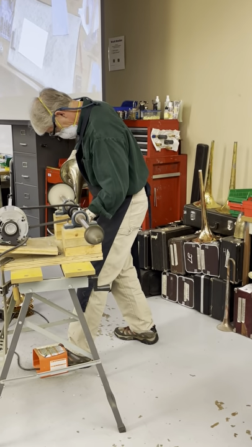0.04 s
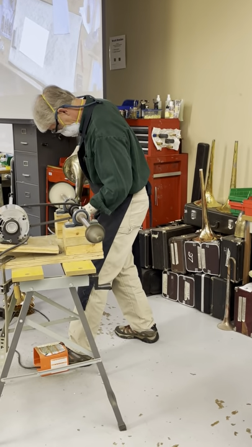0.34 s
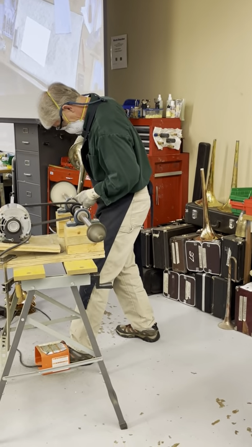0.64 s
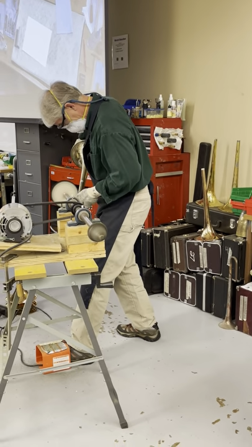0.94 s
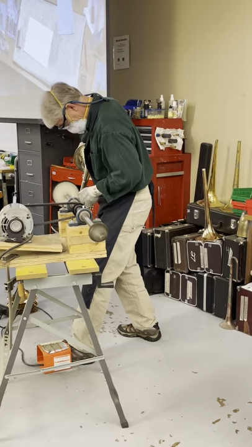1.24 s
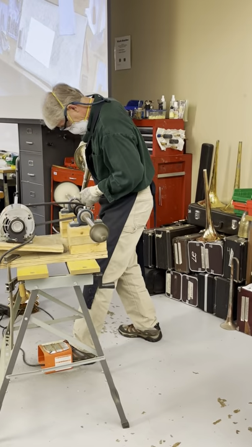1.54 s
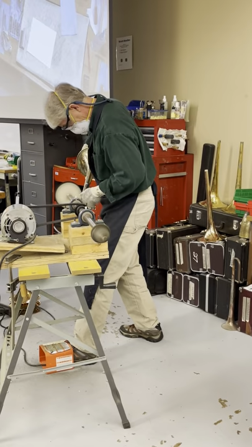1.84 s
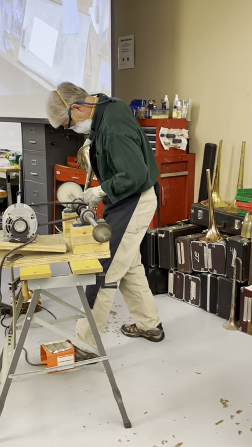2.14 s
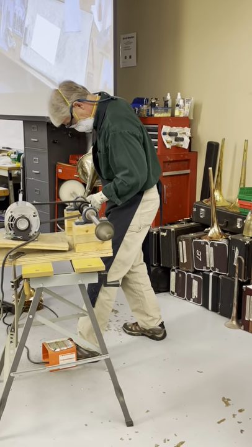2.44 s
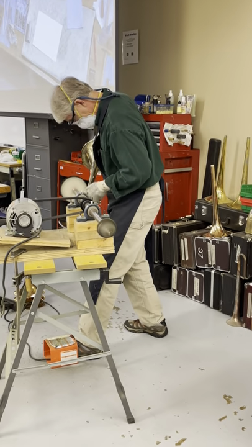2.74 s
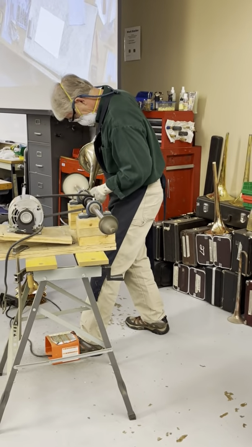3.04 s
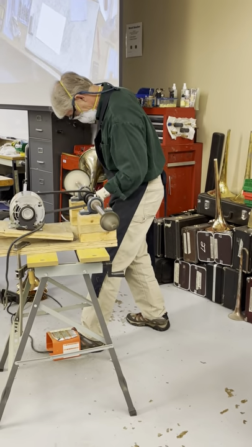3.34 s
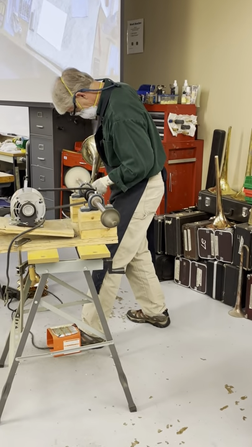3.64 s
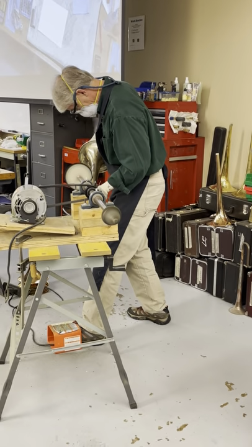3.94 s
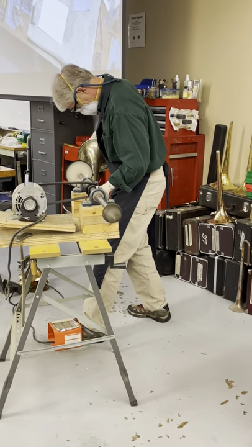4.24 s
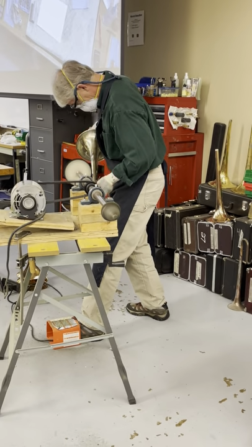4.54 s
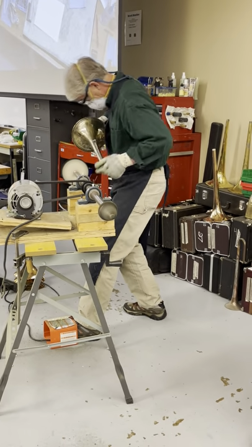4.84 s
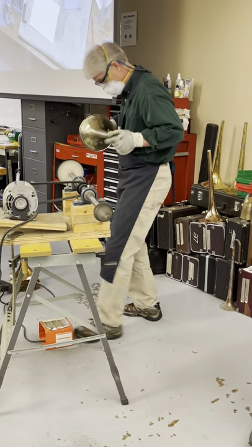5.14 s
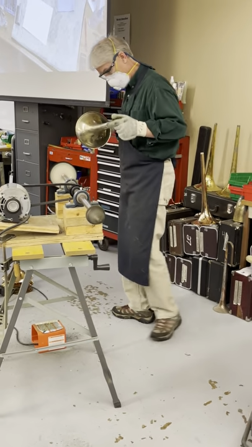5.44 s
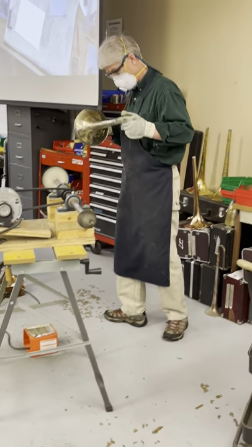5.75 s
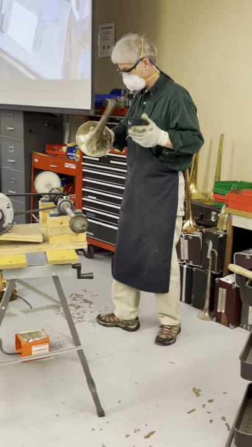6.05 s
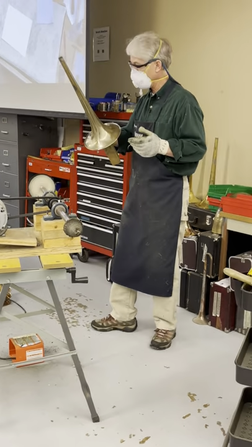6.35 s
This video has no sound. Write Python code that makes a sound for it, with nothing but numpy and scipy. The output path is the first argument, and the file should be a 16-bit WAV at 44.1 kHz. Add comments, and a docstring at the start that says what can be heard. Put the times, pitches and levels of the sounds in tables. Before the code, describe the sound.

From the start, a brass instrument bell rubs against a spinning cloth buffing wheel, heard close in stereo in a workshop. A gritty, rapidly fluttering hiss sits over the electric motor's whirr and hum. The metal rings and buzzes in uneven strokes, several a second, with high tones swelling and fading. At about 4.5 seconds the bell lifts off: the hiss dies quickly and the motor speeds up slightly, its whine clearer. Just after 5 seconds a metal foot pedal clicks and cuts the power. The whirr falls in pitch and fades, and the shaft gives a faint squeak from about 5.5 seconds, ending in a falling chirp as it stops near 6 seconds. Meanwhile gloves softly scuff and tick on the brass. A low ventilation rumble runs underneath throughout and remains alone until the end, around 6.5 seconds.

```python
"""A brass bell held against a cloth buffing wheel, close to a stereo microphone pair in a workshop.
The tufts brush the metal on every turn and make it hiss, ring and sing, stroke by stroke.
The bell is lifted off and the motor speeds up; a pedal switch cuts the power, and the spindle
coasts down and stops with a faint squeak. All round the room the ventilation rumbles on."""
import sys
import numpy as np
from scipy import signal
from scipy.fft import rfft, irfft
from scipy.io import wavfile
from scipy.ndimage import uniform_filter1d

SR = 44100
rng = np.random.default_rng(int(sys.argv[2]) if len(sys.argv) > 2 else 0)


def wav_record(signal):
    """Record a signal, one row per channel, as 16-bit PCM in the file named by sys.argv[1]."""
    frames = np.transpose(np.atleast_2d(signal))
    bounded = np.clip(frames, -1, 1)
    # unit amplitude maps onto the largest positive 16-bit level
    quanta = np.round(bounded * 32767).astype(np.int16)
    wavfile.write(sys.argv[1], SR, quanta)


N = 290598
TIME = np.arange(N) / SR
BIN_HZ = np.arange(N // 2 + 1) * SR / N

# Noise spectra. Each row: frequency in Hz, relative level in dB.
VENT_SPECTRUM = [(20, -15), (38, -19), (52, 2.5), (65, 7.5), (82, -1), (150, -14), (205, -3.5), (300, -9),
                 (400, -9.5), (600, -19), (1000, -33), (1600, -35.5), (3000, -33.5), (6000, -39.5),
                 (12000, -56), (16000, -62)]
WHIRR_SPECTRUM = [(100, -9), (280, 10), (540, 11.5), (750, -3), (1000, -11), (1500, 2.5), (2200, 3.5),
                  (3200, 0.5), (5500, -8.5), (8000, -13.5), (12000, -20.5), (16000, -17)]
HISS_SPECTRUM = [(400, -39), (800, -15.5), (1100, -1.5), (1500, -4.5), (2200, 2), (3000, -1), (3600, -4),
                 (4400, -4), (6300, -0.5), (8000, -14), (10000, -16), (16000, -13.5)]
RUSTLE_SPECTRUM = [(150, -13), (400, -4.5), (650, -12.5), (1000, -11.5), (2500, -50)]
GRIT_SPECTRUM = [(3000, -17), (7000, -25), (9000, 9.5), (11000, -2), (12800, -7), (14500, -5), (16000, 4)]
# Resonances. Each row: frequency in Hz, width in Hz, relative level in dB.
DUCT_MODES = [(126.6, 31, 0)]
CASING_MODES = [(748, 120, -6)]   # air cavity of the motor
HOUSING_MODES = [(766, 49, 3), (1360, 200, -2), (1750, 490, -2.5), (2110, 400, -4)]   # spindle housing
PEDAL_MODES = [(1030, 110, -3), (1450, 120, 1), (2180, 250, -1), (2580, 110, 5.5), (2930, 200, -0.5),
               (3830, 610, -11), (4800, 400, -5), (6430, 780, -9)]   # the pedal's metal shell
KNOCKED_BELL_MODES = [(1130, 124, 2), (2240, 280, -1), (3080, 500, -3.5), (3800, 400, -3.5),
                      (4760, 470, -2.5), (6000, 1100, -5.5), (9250, 2700, -13), (14800, 2000, -18)]
# Whine of fan and bearings. Each entry: a multiple of the spindle speed.
WHINE_ORDERS = [7.4, 12, 13, 14, 15, 22, 23, 25, 31]
# The same tones. Each row: level in dB running free, level in dB under the bell.
WHINE_DB = [(-50, -55.5), (-55, -66), (-67.5, -60), (-50, -54), (-50, -51.5), (-63, -57), (-63, -57.5),
            (-57, -65), (-61, -52.5)]
# Rub of the stopping shaft. Each row: time in seconds, pitch in Hz, level in dB,
# relative level of the octave in dB, roughness as a share of the pitch.
SHAFT_RUB = [(5.45, 3130, -85, -20, 0.15), (5.55, 3080, -57, -15, 0.08), (5.8, 3065, -61, -18, 0.11),
             (5.87, 3020, -56, -5, .055), (5.9, 2790, -58.5, -2, 0.1), (5.92, 2380, -62, 13, .05),
             (5.95, 2225, -58, 5, 0.14), (6.0, 2150, -90, 0, .05)]
# Small impacts. Each row: start in seconds, relative level in dB, treble boost in dB.
PEDAL_CONTACTS = [(5.0682, -18, -19), (5.073, -32, -14), (5.129, -36, -6), (5.149, -34, -8)]
BELL_TOUCHES = [(0.184, -19, -14), (0.198, -28, -10), (0.372, -23, -12), (5.42, -39, -1), (5.4414, -32, 6),
                (5.446, -41, 2), (5.551, -43, 4), (5.652, -42.5, -7), (5.749, -44, -2), (5.927, -46, 6),
                (6.059, -47, 2)]
# Gloves on the lifted bell. Each row: time in seconds, level in dB.
GLOVE_LEVELS = [(4.7, -78), (5.0, -54), (5.5, -62), (5.9, -62), (6.2, -78)]
# Strokes across the wheel. Each row: middle in seconds, length in seconds, rise of the ring in dB,
# push as spindle speed lost in turns per second (negative when the hands ease off).
BELL_STROKES = [(0.01, 0.16, 9, 0), (0.18, .2, 4.5, 0.6), (0.304, .17, -3, -.3), (0.41, .2, 7.5, .5),
                (0.588, .3, 5, .35), (0.878, .26, 2, .25), (1.209, .32, 7, -.1), (1.516, .26, 6.5, -.25),
                (1.747, .24, 8, .2), (1.878, .24, 9, .05), (2.107, .24, 9.5, .05), (2.302, .26, 8, .25),
                (2.523, .24, 3.5, -.55), (2.753, .24, 6.5, .15), (2.963, .16, 1, -.35),
                (3.101, .28, 7.5, .65), (3.322, .36, 6, -.1), (3.565, .26, 6.5, .6), (3.741, .2, 2.5, -.15),
                (3.95, .28, 6, .7), (4.221, .36, 5.5, .5), (4.462, .24, 3.5, -.4)]
# Slow course of the rubbing. Each row: time in seconds, hiss and grit levels in relative dB.
RUBBING_LEVELS = [(0.0, -33.5, -43), (0.17, -35, -45), (0.29, -35.5, -46.5), (0.98, -37.5, -46),
                  (1.16, -36.5, -48), (1.92, -36.5, -46), (2.04, -38, -43), (2.82, -36, -47.5),
                  (2.89, -38, -45), (3.37, -34.5, -42.5), (3.61, -34, -43.5), (3.75, -36.5, -46),
                  (3.95, -34.5, -43), (4.5, -35.5, -45.5)]
# The bell's wall, damped by the hands. Each row: frequency in Hz, width in Hz,
# relative levels in dB when rubbed at spots 0, 1 and 2.
WALL_MODES = [(1565, 34, -13, -11.5, -9), (1600, 28, -11, -6, -8), (1830, 49, -21, -10, -11),
              (1892, 49, 0, -6, -2.5), (2020, 48, -18, -13, -10), (2150, 57, -10, -14, -13),
              (2197, 28, 0, -13, -3), (2330, 48, -31, -8, -14), (2634, 51, -15, -9, -18),
              (2850, 40, -5.5, -6.5, -11), (3320, 45, -9, -7.5, -6.5), (3810, 59, -6, -7, -14),
              (3960, 160, -2, -15, -8), (4080, 66, -12, -13, -10), (4325, 103, 1, -5, -2),
              (4500, 66, -15, -11, -7), (4730, 84, -6, -4.5, -7), (5180, 100, -14, -7, -10),
              (5570, 43, -17, -28, -24), (9300, 96, -28, -18, -20)]
# Where the wheel touches. Each row: time in seconds, spot (beyond 0-2 the nearest end counts).
CONTACT_SPOT = [(0, -1.5), (.42, 0), (.52, 9), (.9, 1.1), (2.35, 1.2), (2.46, 2), (3.95, 3), (4.04, 0.11),
                (4.5, 0)]
# Slaps of the oval rim. Each row: time in seconds, their share of the ring's power from 0 to 1.
SLAP_SHARE = [(0.3, .02), (.5, .12), (1.1, .36), (2.0, .6), (2.2, .6), (2.5, .18), (3.1, .3), (3.6, .2),
              (4.1, .03)]
# Swelling tones: ringing brass, and near 726 Hz the spindle's whine as the hands ease off.
# Each row: middle in seconds, length in seconds, pitch in Hz, level in dB.
SWELLING_TONES = [(0.125, 0.14, 2210, -38.5), (0.265, 0.22, 2228, -33.5), (0.373, .08, 2180, -38),
                  (0.576, 0.21, 2205, -37), (0.852, 0.23, 2204, -40.5), (0.308, 0.2, 2826, -41.5),
                  (0.155, 0.13, 4750, -40), (0.213, 0.23, 4280, -46), (0.697, .16, 3340, -48),
                  (1.196, .22, 2370, -43.5), (1.287, 0.23, 4780, -48), (1.504, 0.13, 2330, -38),
                  (1.506, 0.18, 2250, -45), (1.547, 0.25, 2637, -41), (1.557, 0.22, 3330, -47),
                  (1.637, .14, 5170, -45), (1.828, 0.33, 2330, -41.5), (1.955, 0.3, 1596, -43),
                  (2.107, 0.18, 2314, -42), (2.308, .16, 2330, -40), (2.313, 0.13, 2215, -40),
                  (1.2, .3, 4335, -49), (1.6, 0.45, 4310, -48), (2.15, 0.45, 4330, -49),
                  (2.44, 0.094, 4300, -45), (2.522, 0.37, 1515, -43.5), (2.563, 0.36, 3245, -46),
                  (2.57, 0.29, 725.4, -41.5), (2.674, 0.2, 4300, -42), (2.71, 0.12, 5190, -48),
                  (2.954, .16, 5020, -44), (2.957, .14, 9450, -46), (2.975, 0.18, 726, -42.5),
                  (3.01, 0.18, 1593, -42), (3.15, 0.22, 1575, -44), (3.48, 0.23, 1870, -41.5),
                  (3.608, 0.18, 1588, -39.5), (3.6, 0.1, 4700, -45), (3.67, 0.2, 4350, -43),
                  (3.75, .3, 5190, -48), (3.867, .14, 4370, -43), (4.003, .18, 4720, -47.5),
                  (4.143, 0.087, 2830, -43), (4.2, 0.7, 2210, -39.5), (4.227, 0.061, 2780, -41),
                  (4.352, 0.079, 2840, -39.5), (4.34, .18, 4730, -42.5), (4.44, 0.18, 2860, -46),
                  (4.52, 0.15, 3200, -45.5), (4.512, 0.091, 5590, -51)]
# The cloth bites on the rim. Each row: middle in seconds, length in seconds, pitch in Hz, level in dB.
RIM_ZINGS = [(0.188, 0.25, 3910, -39), (.64, .1, 4020, -45), (1.76, .18, 4080, -46),
             (2.326, 0.17, 4050, -44), (2.5, 0.34, 3980, -45.5), (2.713, 0.31, 3960, -46),
             (3.08, .12, 4000, -45), (3.21, 0.17, 3990, -41), (3.556, 0.24, 3900, -45),
             (3.91, 0.11, 3950, -39.5), (4.22, 0.35, 3950, -43)]
# Phase across the microphone pair. Each row: frequency in Hz, lead of the left in radians.
PAIR_PHASE = [(200, 0), (750, -1.1), (1200, 0), (1900, .2), (2600, .95), (3600, .6), (4500, .85),
              (5150, -.1), (7100, 2.95), (8200, 3.3), (10400, 5.9), (11600, 6.4), (13500, 9.1),
              (14800, 9.6), (15700, 10.6)]
# Likeness of its channels. Each row: frequency in Hz, likeness from 0 to 1.
PAIR_LIKENESS = [(170, 1), (400, .95), (750, .65), (1050, .3), (1600, .35), (2000, .93), (6500, .88),
                 (7600, .99), (9000, .8), (11000, .96), (12500, .65), (14200, .98), (15700, .8)]
# Its balance. Each row: frequency in Hz, left minus right in dB.
PAIR_BALANCE = [(180, 0), (350, 3.7), (520, 1), (750, -2.6), (1100, -6), (1600, -2), (2100, .3), (3000, 0)]

FREE_TURNS_PER_S, SAG_TURNS_PER_S = 53.22, 1.65   # the free spindle; its loss under the bell
LIFT_S, POWER_OFF_S = 4.53, 5.069


def from_db(db):
    """Decibels to gain."""
    return 10 ** (np.asarray(db) / 20)


def rms_one(x):
    """Scale to rms 1."""
    return x / np.sqrt(np.mean(x ** 2) + 1e-20)


def levelled(x, window=4300):
    """Hold the running rms at 1 over a window of samples."""
    return x / np.sqrt(np.abs(uniform_filter1d(x ** 2, size=window)) + 1e-12)


def in_time(rows):
    """Each column of a curve at every sample."""
    seconds, *columns = np.transpose(rows)
    return [np.interp(TIME, seconds, column) for column in columns]


def per_bin(points):
    """A table over log frequency, read at every FFT bin."""
    hz, value = np.transpose(points)
    return np.interp(np.log(BIN_HZ + 1), np.log(hz), value)


def coloured(x, spectrum):
    """Filter x by a smooth spectrum; rms 1."""
    return rms_one(irfft(rfft(x) * from_db(per_bin(spectrum)), N))


def resonate(x, modes):
    """Parallel resonances of alternating sign."""
    out = 0
    for k, (hz, width, db) in enumerate(modes):
        r = np.exp(-np.pi * width / SR)
        poles = [1, -2 * r * np.cos(2 * np.pi * hz / SR), r * r]
        gain = (-1) ** k * from_db(db) * (1 - r * r) / 2
        out = out + gain * signal.lfilter([1, 0, -1], poles, x + 1e-18)
    return out


def steep_band(x, hz, width_hz):
    """Two resonances in series, the second twice as wide."""
    return resonate(resonate(x, [(hz, width_hz, 0)]), [(hz, 2 * width_hz, 0)])


def wander(rate_hz):
    """Random drift of rms 1, mostly slower than rate_hz."""
    phases = np.exp(2j * np.pi * rng.random(len(BIN_HZ)))
    return rms_one(irfft(phases / (1 + (BIN_HZ / rate_hz) ** 2), N))


def arch(middle, length):
    """A swell from 0 to 1 and back."""
    return np.maximum(1 - (2 * (TIME - middle) / length) ** 2, 0)


def impulses(times, sizes):
    """Clicks of given sizes at given times."""
    inside = (times > 0) & (times < TIME[-1])
    return np.bincount(np.round(times[inside] * SR).astype(int), sizes[inside], N)


def ventilation():
    """Room tone: a diffuse rumble with a duct drone and a wavering hum."""
    rumble = coloured(rng.standard_normal((2, N)), VENT_SPECTRUM)
    drone = rms_one(resonate(rng.standard_normal((2, N + SR)), DUCT_MODES)[:, SR:])
    hum = np.sin(2 * np.pi * 120 * TIME + .3 * wander(3))
    return from_db(-40) * rumble + from_db(-46) * drone + from_db(-39.5) * hum


def workshop(x, t60_s=0.28):
    """Dense reflections off the walls, as strong as their source."""
    age = TIME[:SR // 2]
    tail = rng.standard_normal(len(age)) * from_db(-60 * age / t60_s) * (age > .003)
    return signal.fftconvolve(x, tail / np.sqrt(np.sum(tail ** 2)))[:N]


def load(spin_up_s=.11):
    """The bell's drag on the motor: 1 on the wheel, easing to 0 once it is lifted."""
    return np.clip(1 - (TIME - LIFT_S) / spin_up_s, 0, 1)


def spindle(push, braking_turns_per_s2=62.5):
    """Speed and angle in turns: drag slows the motor; without power, friction stops the shaft."""
    powered = FREE_TURNS_PER_S - load() * (SAG_TURNS_PER_S + push)
    coasting_s = np.maximum(TIME - POWER_OFF_S, 0)
    first_drop = 2 * np.minimum(coasting_s * 20, 1)
    speed = np.maximum(powered - braking_turns_per_s2 * coasting_s - first_drop, 0)
    turns = np.cumsum(speed) / SR
    return speed, turns - np.interp(POWER_OFF_S, TIME, turns)


def whirr(speed):
    """Air churns round the wheel and blows through the motor casing, louder with speed."""
    air = rng.standard_normal(N) * from_db(2.1 * wander(130))
    pace = speed / speed.max()
    hollow = from_db(CASING_MODES[0][2]) * rms_one(resonate(air, CASING_MODES))
    return (coloured(air, WHIRR_SPECTRUM) * pace + hollow * pace ** 0.86) * from_db(-45)


def motor_tones(speed, turns, push, fan_order=6.4):
    """Fan and bearings sing at multiples of the shaft speed, change under load and fade as it coasts."""
    contact = load()
    pace = np.where(TIME > POWER_OFF_S, speed / speed.max(), 1)
    fan_db = -32.5 - contact * (8 + 1.5 * push)
    fan = from_db(fan_db) * np.sin(2 * np.pi * fan_order * turns + 0.055 * wander(11))
    whine = 0
    for order, (free_db, loaded_db) in zip(WHINE_ORDERS, WHINE_DB):
        db = free_db + contact * (loaded_db - free_db + 0.5 * push) + 2 * wander(4.6)
        whine = whine + from_db(db) * np.sin(2 * np.pi * (order * turns + rng.random()))
    return np.sqrt(2) * (fan * pace ** 15 + whine * pace ** 3.9)


def housing_knocks(speed, turns):
    """The spindle knocks in its housing once a turn, softer as it slows."""
    times = np.interp(np.arange(np.ceil(turns[0]), turns[-1]), turns, TIME)
    blows = impulses(times, from_db(rng.normal(0, 1.5, len(times))))
    return resonate(blows * (speed / speed.max()) ** 1.7, HOUSING_MODES)


def shaft_squeak():
    """The shaft rubs faintly and ends in a falling, unsteady chirp."""
    hz, db, octave_db, roughness = in_time(SHAFT_RUB)
    phase = 2 * np.pi * np.cumsum(hz * (1 + roughness * wander(309))) / SR
    tone = np.sin(phase) + from_db(octave_db) * np.sin(2 * phase)
    rubbing = (TIME > SHAFT_RUB[0][0]) * (TIME < SHAFT_RUB[-1][0])
    return rubbing * from_db(db + 5.4 * wander(50)) * tone


def metal_clicks(contacts, modes, rattle_s, gain_db, split_hz=3500):
    """Each contact snaps, rattles for a few milliseconds and rings the metal."""
    times, db, treble_db = np.transpose(contacts)
    burst = np.exp(-TIME[:SR // 20] / rattle_s)
    dull = np.convolve(impulses(times, from_db(db)), burst)[:N]
    sharp = np.convolve(impulses(times, from_db(db + treble_db)), burst)[:N]
    chatter = rng.standard_normal(N)
    top = signal.sosfilt(signal.butter(2, split_hz, "high", fs=SR, output="sos"), chatter * sharp)
    body = signal.sosfilt(signal.butter(2, split_hz, fs=SR, output="sos"), chatter * dull)
    return from_db(gain_db) * resonate(body - top, modes)


def gloves(creaks_per_s=140, uneven_db=7, decay_s=0.0035):
    """Gloves shift on the brass in tiny random creaks."""
    onsets = rng.random(N) < creaks_per_s / SR
    creaks = onsets * from_db(uneven_db * np.clip(rng.standard_normal(N), -2, 2))
    envelope = signal.lfilter([1], [1, -np.exp(-1 / (decay_s * SR))], creaks + 1e-18)
    scuffs = resonate(envelope * rng.standard_normal(N), KNOCKED_BELL_MODES[1:])
    return rms_one(scuffs) * from_db(in_time(GLOVE_LEVELS)[0])


def strokes():
    """The hands press and ease in one arch a stroke: rise of the ring in dB, and push."""
    middle, length, rise_db, push = np.transpose(BELL_STROKES)[:, :, None]
    swell = arch(middle, length)
    return np.max(rise_db * swell, axis=0), np.sum(push * swell, axis=0)


def zings():
    """The cloth bites on the rim and sets a band of high resonances buzzing."""
    out, friction = np.zeros(N), rng.standard_normal(N)
    for middle, length, hz, db in RIM_ZINGS:
        swell = arch(middle, length)
        held = swell > 0
        buzz = rms_one(steep_band(friction[held], hz, width_hz=270))
        out[held] += buzz * swell[held] * from_db(db)
    return out


def swelling_tones(turns, throb_db=2.5):
    """Narrow tones of rubbed brass or spindle whine; each swells, throbs once a turn and fades."""
    out, noise = np.zeros(N), rng.standard_normal(N)
    for middle, length, hz, db in SWELLING_TONES:
        swell = arch(middle, length)
        held = swell > 0
        tone = levelled(steep_band(noise[held], hz, width_hz=13.5), window=300)
        out[held] += tone * swell[held] * from_db(db + throb_db * np.cos(2 * np.pi * turns[held]))
    return out


def tufts(turns, count=90, memory_turns=12, uneven_db=3.5, jitter_s=35e-6, lumpy_db=0.16):
    """The same cloth tufts strike on every turn and slowly rearrange; loose fibres add plain hiss."""
    laps = np.arange(np.floor(turns[0]), 0)   # turn 0 is where the power goes off
    angles = (np.arange(count) + rng.random(count)) / count
    memory = np.exp(-1 / memory_turns)
    drift = signal.filtfilt([1 - memory], [1, -memory], rng.standard_normal((count, 2 * len(laps))))
    stiffness = rms_one(drift[:, len(laps) // 2:][:, :len(laps)])
    sizes = from_db(uneven_db * np.minimum(stiffness, 2.3) + 2.5 * rng.standard_normal(stiffness.shape))
    sizes *= rng.choice([-1, 1], (count, 1))
    times = np.interp(laps + angles[:, None], turns, TIME, left=-1)
    times += jitter_s * rng.standard_normal(sizes.shape)
    brush = rms_one(impulses(times, sizes)) + 0.59 * rng.standard_normal(N)
    # the wheel is out of round and presses harder on its high spots
    phase = 2 * np.pi * turns
    high_spots = 0.85 * np.cos(phase) + np.cos(2 * phase) + 0.21 * np.cos(4 * phase)
    return levelled(brush * from_db(lumpy_db * high_spots))


def slaps(turns, rise_db, width_s=0.00068, jitter_s=30e-6):
    """The wheel's rim throws the wall out and back on each turn, in two short bursts."""
    count, part = np.divmod(2 * turns + .5, 1)
    from_peak_s = (part - .5) / (2 * FREE_TURNS_PER_S) + jitter_s * wander(31)
    hz = 1870 + 57 * rise_db   # a firmer stroke stiffens the contact
    burst = np.exp(-.5 * (from_peak_s / width_s) ** 2) * np.sin(2 * np.pi * hz * from_peak_s)
    direction = np.where(count % 2, -from_db(0.5), 1)
    return rms_one(burst * direction * from_db(wander(60)))


def bell_wall(brush, modes):
    """The rubbed spot sets how hard each resonance is driven; each also swells and fades by chance."""
    spot = in_time(CONTACT_SPOT)[0]
    out = 0
    for hz, width, *spot_db in modes:
        swell_db = np.interp(TIME, np.linspace(0, TIME[-1], 75), 2 * rng.standard_normal(75))
        drive_db = np.interp(spot, range(3), spot_db) + swell_db
        out = out + resonate(brush, [(hz, width, 0)]) * from_db(drive_db)
    return levelled(out)


def buffing(turns, rise_db, push, flutter_db=2, lift_db_per_s=153):
    """Cloth on brass, close up: hiss, a low rustle, the ringing wall and the grit of the compound."""
    slow_db, grit_db = in_time(RUBBING_LEVELS)
    hiss_db = slow_db + 0.06 * rise_db + 0.8 * push
    ring_db = -45.5 + rise_db
    brush = tufts(turns)
    low_modes, high_modes = np.split(np.array(WALL_MODES), 2)
    # the oval rim grips and frees the ringing wall twice a turn
    rubbed = bell_wall(brush, low_modes) * from_db(flutter_db * np.cos(4 * np.pi * turns))
    share = in_time(SLAP_SHARE)[0]
    ring = (np.sqrt(1 - share) * rubbed + np.sqrt(share) * slaps(turns, rise_db)) * from_db(ring_db)
    sheen = bell_wall(brush, high_modes) * from_db(0.82 * hiss_db + 0.18 * ring_db - 7.5)
    hiss = coloured(brush, HISS_SPECTRUM) * from_db(hiss_db - 1.7)
    rustle = coloured(rng.standard_normal(N), RUSTLE_SPECTRUM) * from_db(hiss_db - 13.5)
    flicker = from_db(wander(400) + 2 * wander(13))
    grit = coloured(brush * flicker, GRIT_SPECTRUM) * from_db(grit_db + 1)
    # as the bell lifts, the grit needs firm contact and dies twice as fast
    touching = from_db(-lift_db_per_s * np.maximum(TIME - LIFT_S, 0))
    return touching * (hiss + rustle + ring + sheen + touching * grit)


def scene():
    """At the microphone: the machine in front, and the diffuse room from the sides."""
    rise_db, push = strokes()
    speed, turns = spindle(push)
    pedal = metal_clicks(PEDAL_CONTACTS, PEDAL_MODES, rattle_s=0.0037, gain_db=5.5)
    handling = metal_clicks(BELL_TOUCHES, KNOCKED_BELL_MODES, rattle_s=0.0038, gain_db=7) + gloves()
    noises = buffing(turns, rise_db, push) + zings() + whirr(speed) + pedal + shaft_squeak()
    tones = motor_tones(speed, turns, push) + housing_knocks(speed, turns) + swelling_tones(turns)
    into_room = noises + 0.88 * handling   # the handling sounds drier than the machine
    front = 0.97 * noises + handling + tones + 0.48 * workshop(into_room)
    side = workshop(into_room + tones)
    return np.array([front, side]) + ventilation()


def record(dry):
    """A close microphone pair turns front and side sound into left and right; the top is cut."""
    front, side = rfft(dry)
    sign = np.array([[1], [-1]])   # left, right
    alike = per_bin(PAIR_LIKENESS)
    pair = np.sqrt((1 + alike) / 2) * front + sign * np.sqrt((1 - alike) / 2) * side
    pair *= from_db(sign * per_bin(PAIR_BALANCE) / 2) * np.exp(.5j * sign * per_bin(PAIR_PHASE))
    return irfft(pair * (BIN_HZ < 15850), N)


dry = scene()
out = record(dry)
wav_record(out)
```